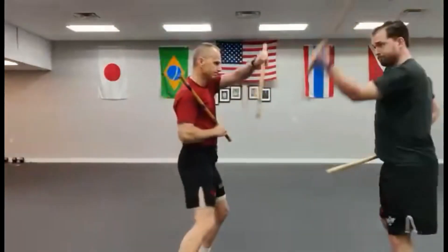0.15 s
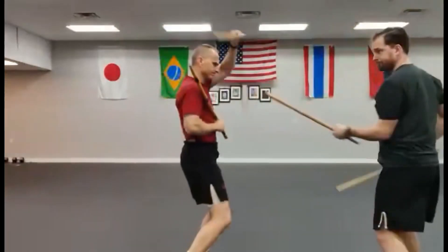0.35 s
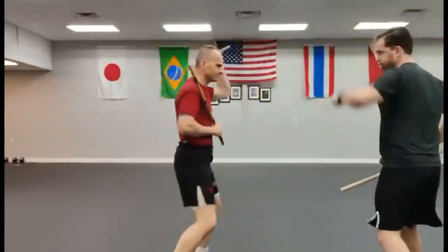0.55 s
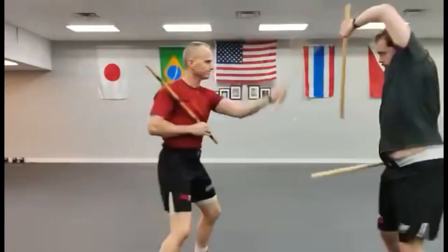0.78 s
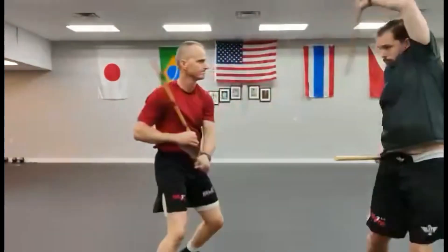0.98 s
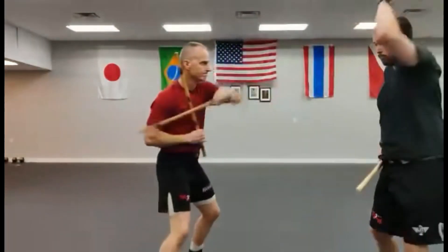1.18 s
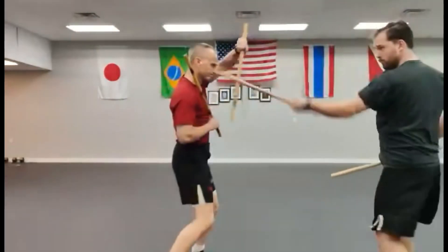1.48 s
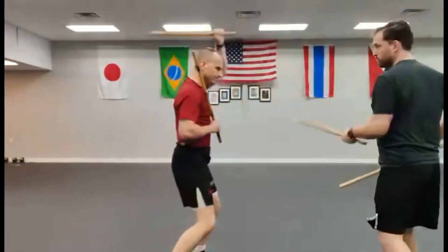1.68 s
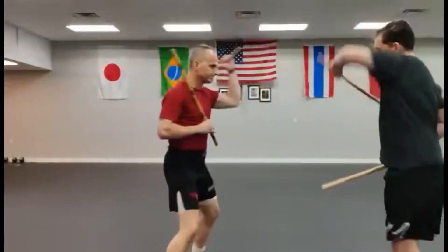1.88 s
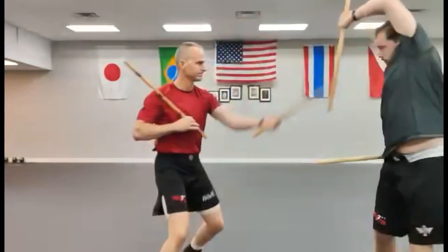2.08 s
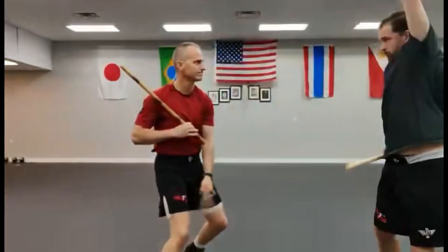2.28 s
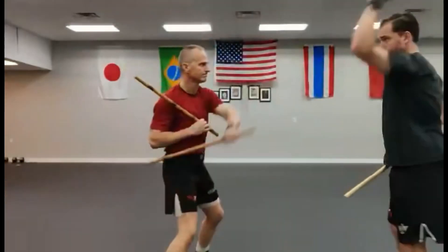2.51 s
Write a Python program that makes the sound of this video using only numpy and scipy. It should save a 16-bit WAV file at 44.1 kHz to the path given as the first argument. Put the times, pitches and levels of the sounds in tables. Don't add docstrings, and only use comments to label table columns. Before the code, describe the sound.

Sharp wooden stick clacks repeat about every six tenths of a second in a wide, reverberant hall, with slight cloth rustle, muffled steps on matting and low ventilation noise, on a phone microphone that dips after each hit.

```python
import sys
import numpy as np
from scipy import signal
from scipy.fft import rfft, irfft
from scipy.io import wavfile
from scipy.ndimage import uniform_filter1d, map_coordinates

SR = 44100
rng = np.random.default_rng(int(sys.argv[2]) if len(sys.argv) > 2 else 0)


def put_to_file(sound):
    columns = np.atleast_2d(sound).T
    safe = np.clip(columns, -1, 1)
    whole_steps = np.round(safe * 32767)
    wavfile.write(sys.argv[1], SR, whole_steps.astype(np.int16))


def gain_from_decibels(decibels):
    exponent = np.asarray(decibels, float) / 20
    return 10 ** exponent


N = 116865


def curve(table, hz):
    t = np.array(table, float)
    return np.interp(np.log(np.maximum(hz, 1)), np.log(t[:, 0]), t[:, 1])


def unit(x):
    return x / np.sqrt(np.mean(x ** 2) + 1e-30)


def band(x, hz, octaves):
    f = np.fft.rfftfreq(x.shape[-1], 1 / SR) + 1
    bell = np.exp(-.5 * (np.log2(f / hz) / octaves) ** 2)
    return irfft(rfft(x) * bell, x.shape[-1])


def pair(noise, like):
    like = np.clip(like, 0, 1)
    shared = np.sqrt((1 + like) / 2) * noise[0]
    return shared + np.sqrt((1 - like) / 2) * noise[1] * np.array([[1], [-1]])


def walk(rate):
    k = int(SR / rate)
    steps = np.repeat(rng.standard_normal(N // k + 1), k)
    return unit(uniform_filter1d(uniform_filter1d(steps, k), k)[:N])


def burst(t, length_s):
    u = np.maximum(t, 0) / length_s
    return u * np.exp(1 - u)


def swell(t, start_s, length_s):
    return np.sin(np.pi * np.clip((t - start_s) / length_s, 0, 1))


def add(out, x, s):
    i = int(round(s * SR))
    x = x[..., max(-i, 0):N - i]
    out[:, max(i, 0):max(i, 0) + x.shape[-1]] += x


# t/s, level/dB, tilt/(dB per octave), treble snap/dB, level of a brief low thump at the same moment/dB
BLOWS = [
    (-.39, -16, -1.5, -30, -60),
    (0.2226, -13, -2.5, -50, -45),
    (0.8248, -13.5, -1.5, -8.5, -19.5),
    (1.4627, -14.5, -2.5, -15, -33),
    (2.0766, -13, -1, -10.5, -26.5),
]
# f/Hz, width/Hz, level/dB
GRIPS = [
    [(2380, 110, 10), (3110, 260, 3), (3650, 99, 7), (4460, 130, 4), (6250, 460, 7.5)],
    [(1150, 200, -0.5), (1540, 220, 5.5), (1990, 210, 5), (2170, 115, -4), (2400, 66, 9.5), (2735, 50, 6),
     (3490, 170, 2.5), (4830, 420, -4.5), (5330, 290, 1.5)],
    [(1368, 71, 9.5), (1815, 37, -4), (2460, 91, 4.5), (3180, 89, 6), (4320, 110, -1.5), (4740, 49, -3),
     (5500, 600, -6.5), (6600, 230, 4)],
    [(1310, 100, -5), (2950, 140, -1.5), (3200, 280, 6.5), (3800, 210, 6), (4000, 53, -2),
     (4600, 230, -5.5), (4760, 150, 0.5), (5480, 200, 5.5), (6194, 133, 8.5), (6750, 85, -3)],
    [(1070, 176, 7), (1465, 180, -6), (2920, 31, -18), (3590, 65, -12), (3680, 520, 4), (4450, 170, 3.5),
     (5000, 80, 2), (5400, 200, 2), (7700, 200, -3)],
]
# f/Hz, width/Hz, level/dB
KNOCKS = [
    [(900, 60, -60)],
    [(496, 35, -39), (817, 85, -19), (1495, 83, -24), (1840, 140, -6.5), (2360, 21, -20.5)],
    [(384, 104, -21), (680, 48, -24.5), (1410, 49, -21), (1902, 19, -18)],
    [(900, 100, -16.5), (1194, 64, -14), (1874, 55, -10.5)],
    [(754, 55, -21), (222, 76, -25), (1080, 39, -30), (1970, 70, -19)],
]
# f/Hz, T60/s
HALL_T60 = [(300, 0.63), (700, 0.76), (1400, 0.72), (3000, 0.93), (5500, 0.93), (8000, 0.62), (12000, 0.57)]
# f/Hz, correlation/(0-1)
LIKENESS = [(30, 0.87), (100, 1), (400, 0.7), (600, 0.34), (1000, 0.2), (2000, 0.27), (4000, 0),
            (10000, 0.12)]
CONTACT_S, LOWS_LATE_S = 0.0019, 0.002525
CRACK_DB, NEAR_BODY_DB, NEAR_BODY_HZ = -2, 5.5, 1900
TAIL_DB, BUILD_S, TREBLE_BUILD_S = -2, 0.012, 0.026
SPARSE_DB, SPARSE_FADE_S = 0.5, 0.94
SNAP_S, THUMP_HZ, THUMP_S = 0.0018, 77, 0.0057


def sticks():
    out, t = np.zeros((2, N)), np.arange(1 << 15) / SR - .01
    age = np.maximum(t, 0)
    for (s, db, tilt_db, snap_db, thump_db), grip, modes in zip(BLOWS, GRIPS, KNOCKS):
        clumps = unit(uniform_filter1d(rng.standard_normal(t.shape), size=60))
        noise = rng.standard_normal((2, len(t))) * gain_from_decibels(SPARSE_DB * clumps * np.exp(-age / SPARSE_FADE_S))
        near = rng.standard_normal((2, len(t)))
        x = 0
        for hz in 250 * 2 ** np.arange(0, 6, .5):
            like = curve(LIKENESS, hz)
            if hz < 9000:
                build = 1 - np.exp(-age / BUILD_S)
            else:
                build = 1 - np.exp(-(age / TREBLE_BUILD_S) ** 2)
            tail = build * gain_from_decibels(TAIL_DB - 60 * age / curve(HALL_T60, hz))
            late_s = LOWS_LATE_S * np.clip(np.log2(6000 / hz), 0, 2)
            body_db = NEAR_BODY_DB * np.exp(-np.log2(hz / NEAR_BODY_HZ) ** 2)
            crack = burst(t - late_s, CONTACT_S) * gain_from_decibels(CRACK_DB + body_db)
            x = x + band(pair(noise, like) * tail + pair(near, like + 0.41) * crack, hz, 0.25)
        x = wood(x, grip, tilt_db) * 3.47
        snap = band(pair(near, 0) * np.exp(-np.abs(t - .001) / SNAP_S), 12000, 0.68)
        thump = np.cos(2 * np.pi * THUMP_HZ * t) * np.exp(-(t / THUMP_S) ** 2)
        x = x + gain_from_decibels(snap_db) * 1.76 * snap + gain_from_decibels(thump_db) * thump
        add(out, gain_from_decibels(db) * x + knock(modes, t), s - .01)
    return out


# f/Hz, level/(dB per Hz)
CRACK = [(180, -56), (300, -29), (660, -26.5), (1030, -15), (3140, 0), (6270, 3), (9830, -18.5),
         (12500, -28.5), (14000, -78)]
COMB_DB, COMB_HZ = .8, 120


def wood(x, grip, tilt_db):
    f = np.fft.rfftfreq(x.shape[-1], 1 / SR) + 1
    ring_db = sum(db / (1 + (2 * (f - hz) / width) ** 2) for hz, width, db in grip)
    comb = map_coordinates(rng.standard_normal(400), [f / max(COMB_HZ, 60)])
    gain = gain_from_decibels(curve(CRACK, f) + tilt_db * np.log2(f / 3500))
    cep = irfft(np.log(gain_from_decibels(COMB_DB * comb + ring_db)))
    cep[1:len(f) - 1] *= 2
    cep[len(f):] = 0
    return irfft(rfft(x) * gain * np.exp(rfft(cep)), x.shape[-1])


def knock(modes, t):
    age = np.maximum(t - LOWS_LATE_S, 0)
    phases = rng.uniform(0, 2 * np.pi, (len(modes), 1, 1)) + 0.56 * rng.standard_normal((len(modes), 2, 1))
    onset, out = 1 - np.exp(-age / 0.0015), 0
    for (hz, width, db), phase in zip(modes, phases):
        out = out + gain_from_decibels(db) * np.sin(2 * np.pi * hz * age + phase) * onset * np.exp(-np.pi * width * age)
    return out


# t/s, level/dB, left-right difference/dB, centre f/Hz
ECHOES = [(0.2237, -5.5, -3, 3520), (0.2265, -5, -2, 3200), (0.2294, -2.5, -6, 3000), (0.239, 6, 2, 5300),
          (.2649, 2, -1, 6000), (0.2678, 4, -3, 3370), (0.272, -2.5, 1, 5500), (0.2777, -3, -3, 4800),
          (.2856, -2, 0, 2700), (0.296, -11, 0, 2600), (.3181, -2, -4, 5650), (0.4052, -16, -11, 5800),
          (0.8275, -6, 26, 4800), (.8289, -27, 9, 5100), (.8317, -30, 0, 2900), (0.844, -6, 3, 4700),
          (.855, -7, 3, 6300), (0.88, -1, 2, 3100), (.9259, -10, 5, 3500), (0.946, -23, 2, 3460),
          (1.051, -22.5, -14, 3800), (1.4651, -9.5, 4, 5040), (1.4664, 4.5, -2, 3400),
          (1.4736, -6.5, 5, 4230), (1.5193, 2.5, 2, 4570), (1.6036, -6, 4, 3700), (1.6047, -6.5, -2, 4770),
          (1.6387, -14, -9, 5960), (1.695, -13, -5, 4500), (1.7775, -17, -17, 3800),
          (1.7939, -35, -6, 4240), (1.8325, -26, -9, 5560), (1.8623, -19, -4, 3800),
          (2.081, -11, -14, 3800), (2.0841, -34, -4, 3280), (2.093, -13, 0, 5800), (2.101, -1, -2, 3800),
          (2.165, -1, -14, 4800), (2.2118, -6, -1, 4600), (2.2272, -7, -10, 4500), (2.2855, -9, -11, 5070),
          (2.3418, -14, -14, 4330)]
TICK_S, TICK_OCTAVES = 0.00026, .7


def echoes():
    out, t = np.zeros((2, N)), np.arange(2048) / SR - .01
    for s, db, pan_db, hz in ECHOES:
        grip = GRIPS[sum(row[0] < s for row in BLOWS) - 1]
        tick = pair(rng.standard_normal((2, len(t))), 1.0) * burst(t, TICK_S)
        x = band(wood(tick, grip, 0), hz, TICK_OCTAVES)
        mid = np.abs(x.mean(axis=0))
        sides = gain_from_decibels(np.array([[pan_db], [-pan_db]]) / 2)
        add(out, gain_from_decibels(db) * x / mid.max() * sides, s - mid.argmax() / SR)
    return out


# t/s, level/dB, centre f/Hz
STEPS = [(0.129, -52, 900), (0.413, -72, 396), (0.514, -46, 260), (.633, -47.5, 566), (.694, -52, 603),
         (.753, -55, 500), (1.207, -50, 444), (1.832, -49, 560), (1.879, -43.5, 210), (.94, -44.5, 202),
         (2.229, -45, 90), (2.309, -49.5, 70), (2.521, -64, 90), (2.47, -54, 506), (2.60, -51, 490)]
STEP_T60_S = 0.15


def feet():
    out, t = np.zeros((2, N)), np.arange(1 << 14) / SR
    for s, db, hz in STEPS:
        x = unit(band(pair(rng.standard_normal((2, len(t))), 0.92), hz, 0.73))
        add(out, gain_from_decibels(db) * x * (1 - np.exp(-t / 0.00033)) * gain_from_decibels(-60 * t / STEP_T60_S), s)
    return out


# start t/s, length/s, level/dB
RUSTLES = [
    (0.066, 0.15, -57),
    (0.625, 0.29, -62.5),
    (1.273, 0.2, -62.5),
    (1.807, 0.059, -57),
    (1.893, 0.19, -62),
    (2.136, 0.34, -57.5),
    (2.572, 0.13, -62.5),
]
RUSTLE_HZ, RUSTLE_OCTAVES = 8500, .45


def clothes():
    out, t = np.zeros((2, N)), np.arange(1 << 14) / SR
    for s, length_s, db in RUSTLES:
        x = rng.standard_normal((2, len(t)))
        grains_db = unit(uniform_filter1d(rng.standard_normal(t.shape), size=150))
        x = unit(band(x * gain_from_decibels(grains_db), RUSTLE_HZ, RUSTLE_OCTAVES))
        add(out, gain_from_decibels(db) * x * swell(t, 0, length_s), s)
    return out


# f/Hz, level/(dB per Hz)
AIR = [(25, -33), (60, -1.5), (120, -4), (220, -4), (400, -13), (800, -18.5), (2000, -18), (7000, -34.5)]
AIR_DB = -52.5


def air():
    out = 0
    for hz in 25 * 2 ** np.arange(0, 8.6, .5):
        x = band(pair(rng.standard_normal((2, N)), curve(LIKENESS, hz)), hz, 0.33)
        out = out + x * gain_from_decibels(curve(AIR, hz) + 1.0 * walk(4.4))
    return unit(out) * gain_from_decibels(AIR_DB)


# start t/s, length/s, level/dB
HUMS = [
    (0.02, 0.12, -88),
    (1.281, 0.18, -53.5),
    (1.548, 0.25, -55),
    (1.846, 0.045, -45.5),
    (2.2, 0.26, -67),
]
DUCT_HZ = 205


def duct():
    t = np.arange(N) / SR
    level = sum(gain_from_decibels(db) * swell(t, s, length_s) for s, length_s, db in HUMS)
    return unit(band(rng.standard_normal(N), DUCT_HZ, 0.1)) * level


def scene():
    return sticks() + echoes() + feet() + clothes() + air() + duct()


# t/s, duck/dB, hold/s, release/s
DUCKS = [
    (0.208, -4, 0.18, 0.01),
    (0.822, -8.5, 0.095, 0.027),
    (1.465, -6.5, 0.1376, 0.0078),
    (2.074, -9, 0.093, 0.073),
]
DUCK_ATTACK_S = 0.022


def duck(x):
    t, db = np.arange(N) / SR, 0
    for s, duck_db, hold_s, release_s in DUCKS:
        fall = 1 - np.exp(-np.maximum(t - s, 0) / DUCK_ATTACK_S)
        db = db + duck_db * fall * np.clip(1 - (t - s - hold_s) / release_s, 0, 1)
    return x * gain_from_decibels(db)


# f/Hz, level/dB
GATE = [(1500, -110), (5500, -95), (7000, -90), (8500, -70), (10500, -68.5), (12500, -75)]
# f/Hz, level/dB
MASK = [(1500, -28), (6500, -21), (8500, -65), (10500, -42), (12500, -47)]
# f/Hz, chance/spreads
SURVIVE = [(8000, -3), (9500, -.6), (10800, .1), (13000, .6)]
PATCH_DB, PATCH_HZ, SURVIVOR_DB = 2, 283.3, 1.5


def gate(x):
    t = np.arange(N) / SR
    top = x - signal.sosfiltfilt(signal.butter(6, 8000, fs=SR, output="sos"), x)
    snap = top * sum(np.exp(-((t - row[0] - .004) / .007) ** 4) for row in BLOWS)
    f, when, z = signal.stft(x - snap, SR, "cosine", nperseg=2048)
    power = np.abs(z) ** 2 * 16
    patch = (f / PATCH_HZ).astype(int)
    first, count = np.unique(patch, return_index=True, return_counts=True)[1:]
    db = 10 * np.log10(np.add.reduceat(power, first, axis=1) / count[:, None] + 1e-20)[:, patch]
    chance = rng.standard_normal((2, len(f), z.shape[2]))[:, patch]
    chance = .8 * chance[0] + .6 * chance
    limit = np.maximum(curve(GATE, f)[:, None], db.max(axis=1, keepdims=True) + curve(MASK, f)[:, None])
    gain = gain_from_decibels(PATCH_DB * chance) * np.clip((db + 8 * chance - limit) / 2, 0, 1)
    gain = gain * (10 * np.log10(power + 1e-20) > limit - 3.0)
    luck = np.repeat(rng.standard_normal((len(f), z.shape[2])), 2, axis=1)[patch, :z.shape[2]]
    loudest = db.max(axis=(0, 1))
    luck = luck + 1.8 * (loudest < db.max() - 22) - 1.0 * (loudest > db.max() - 4)
    gain = gain * (luck > curve(SURVIVE, f)[:, None]) * gain_from_decibels(SURVIVOR_DB * (f > 9500))[:, None]
    gain[:, f < 1200] = 1
    attack = np.min([np.abs(when - row[0]) for row in BLOWS], axis=0) < .0235
    gain[:, (f < 8000)[:, None] & attack] = 1
    return signal.istft(z * gain, SR, "cosine", nperseg=2048)[1][:, :N] + snap


def band_limit(x):
    return signal.sosfilt(signal.butter(12, 14360, fs=SR, output="sos"), x)


CEILING, TOP_HZ = .84, 13150


def record(dry):
    x = duck(dry)
    x = gate(x / (1 + (x / CEILING) ** 4) ** .25)
    x = signal.sosfilt(signal.ellip(6, .3, 30, TOP_HZ, fs=SR, output="sos"), x)
    return band_limit(x)


dry = scene()
out = record(dry)
put_to_file(out)
```